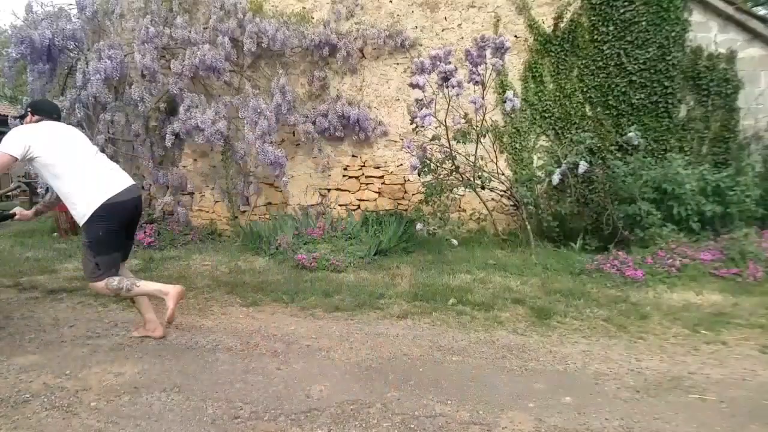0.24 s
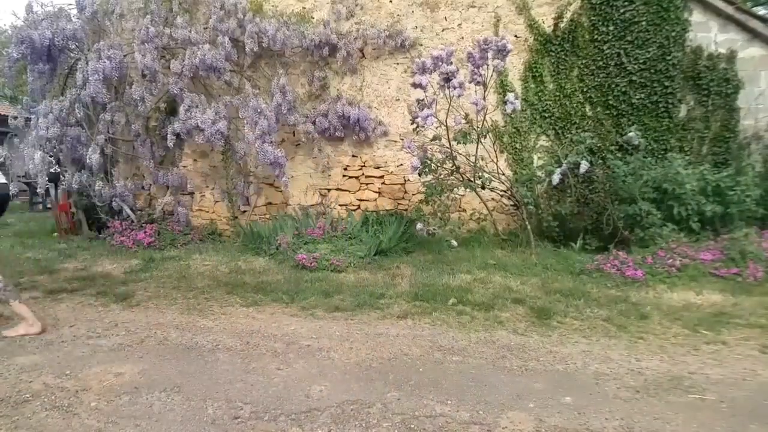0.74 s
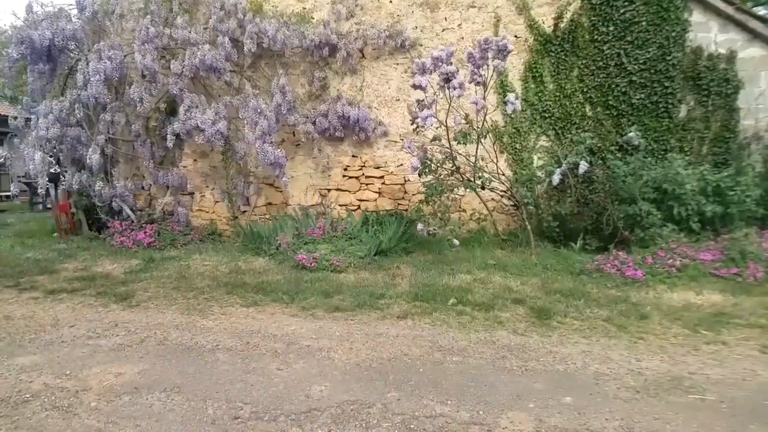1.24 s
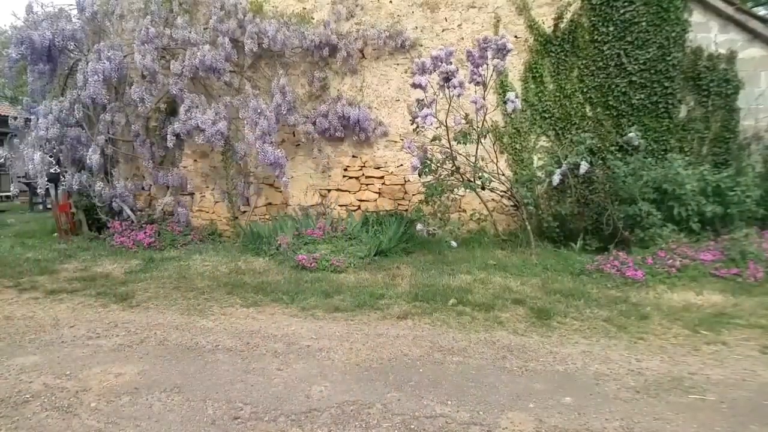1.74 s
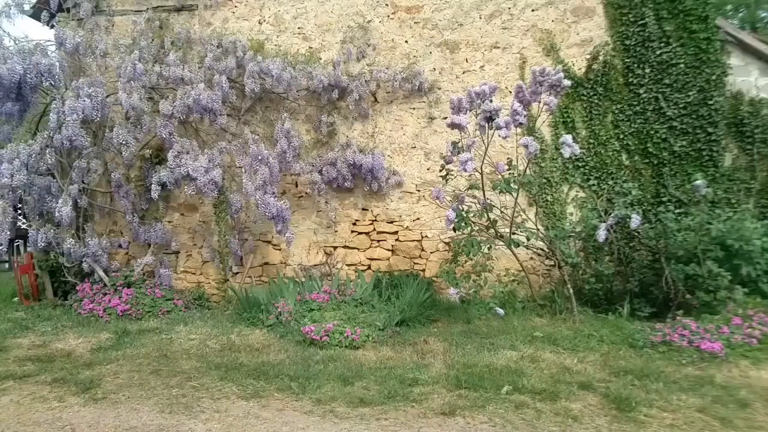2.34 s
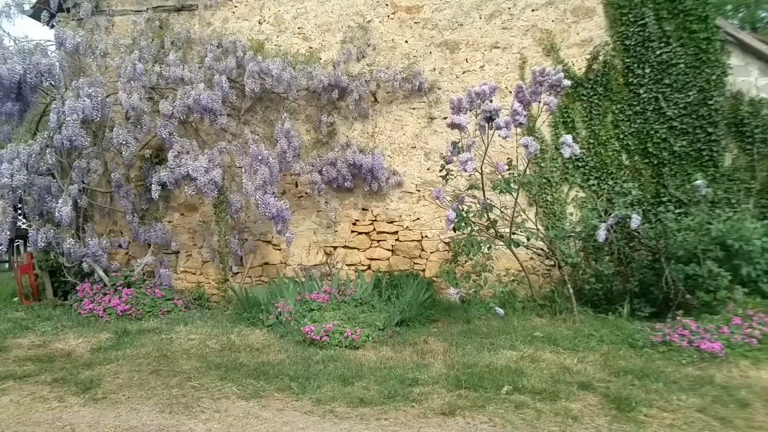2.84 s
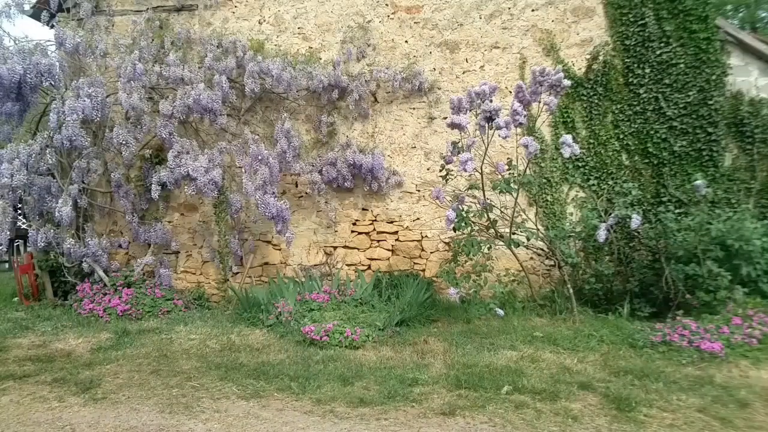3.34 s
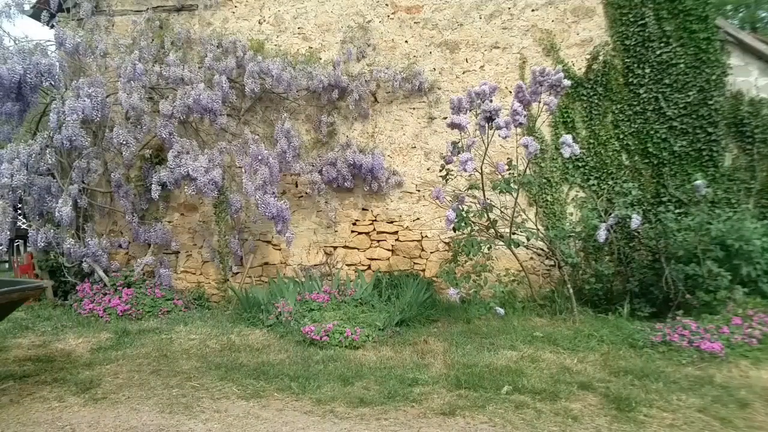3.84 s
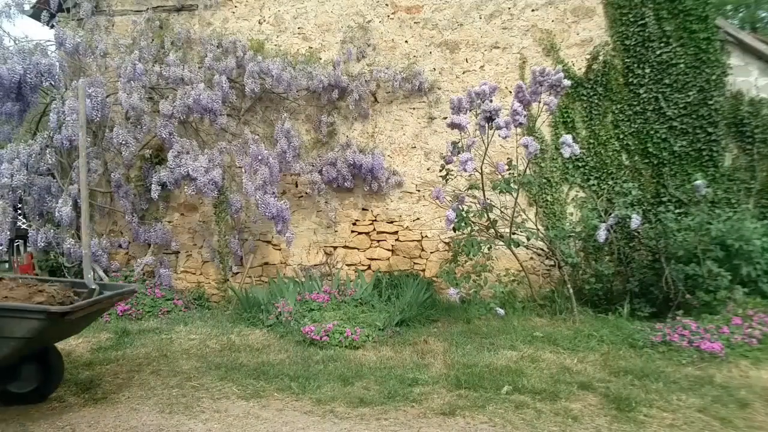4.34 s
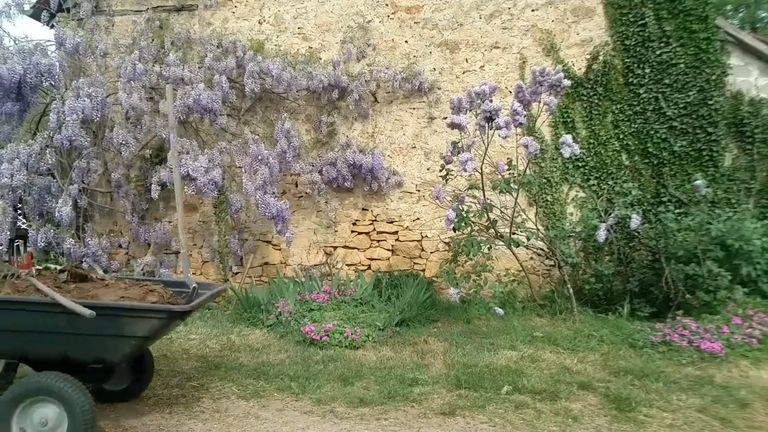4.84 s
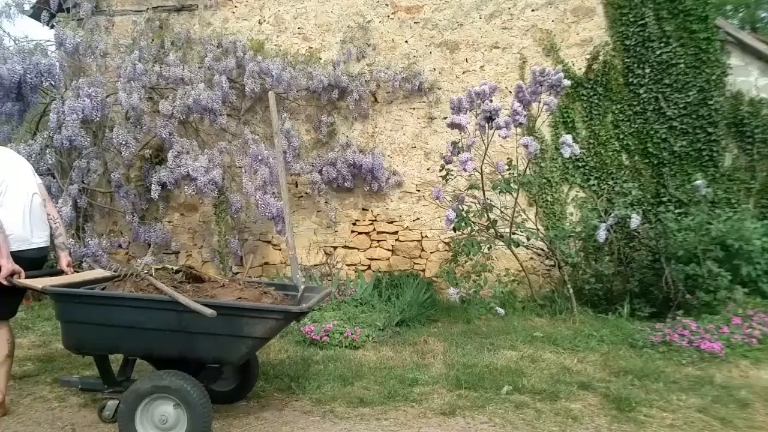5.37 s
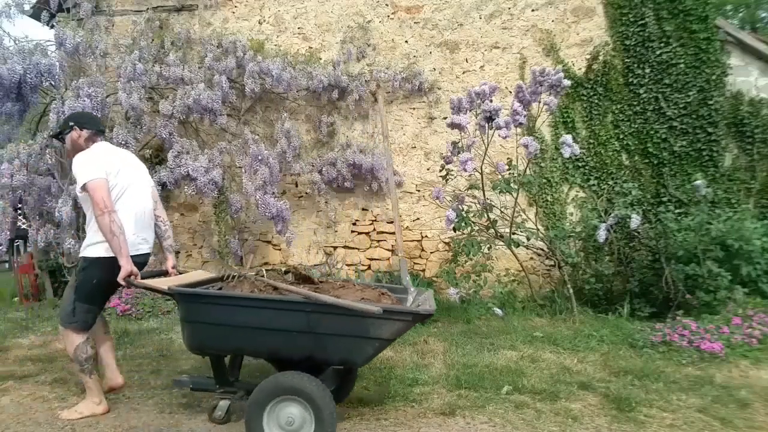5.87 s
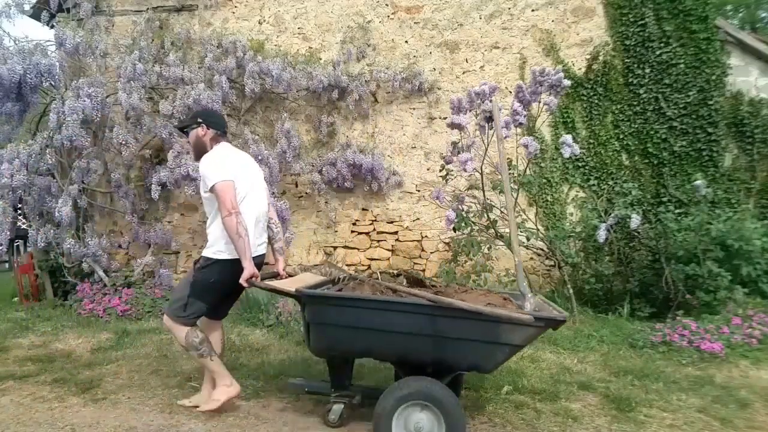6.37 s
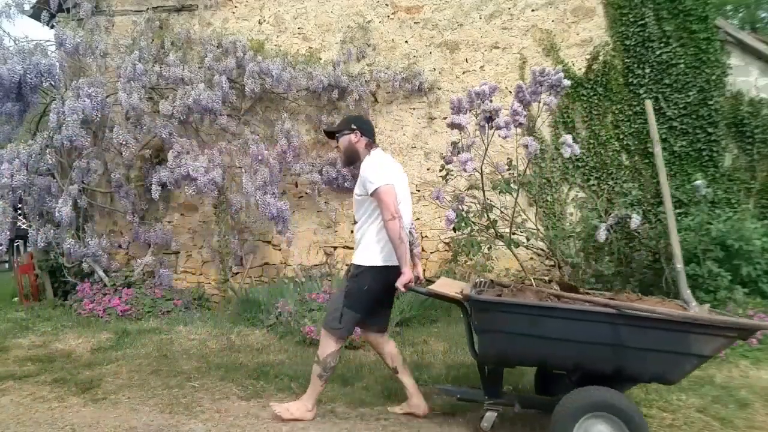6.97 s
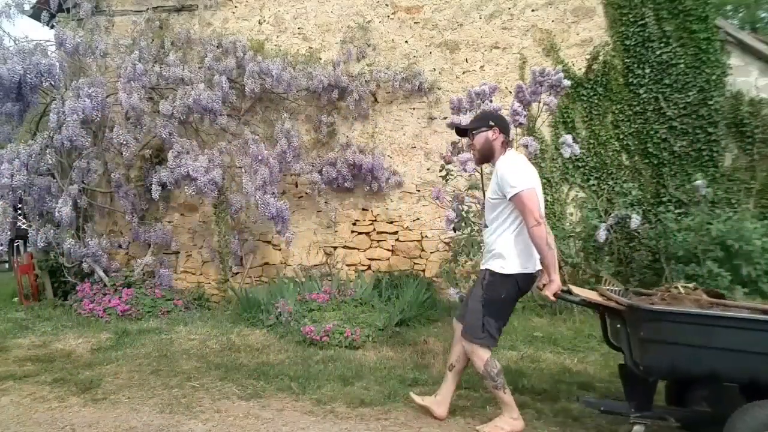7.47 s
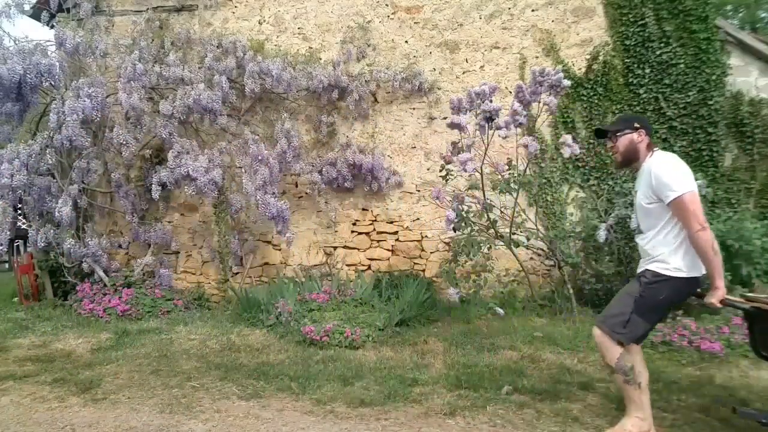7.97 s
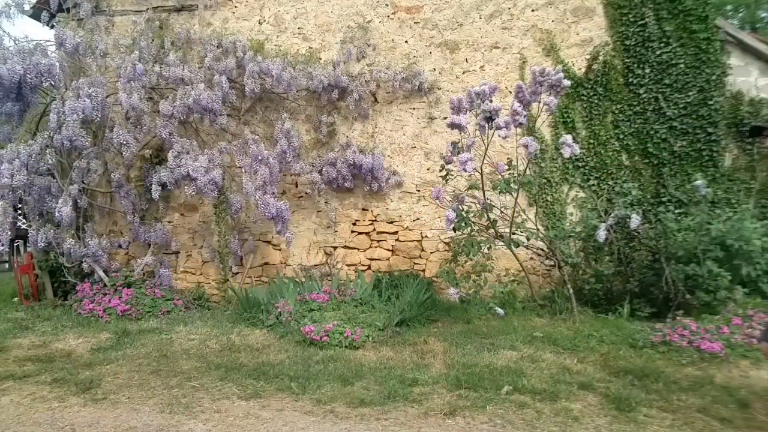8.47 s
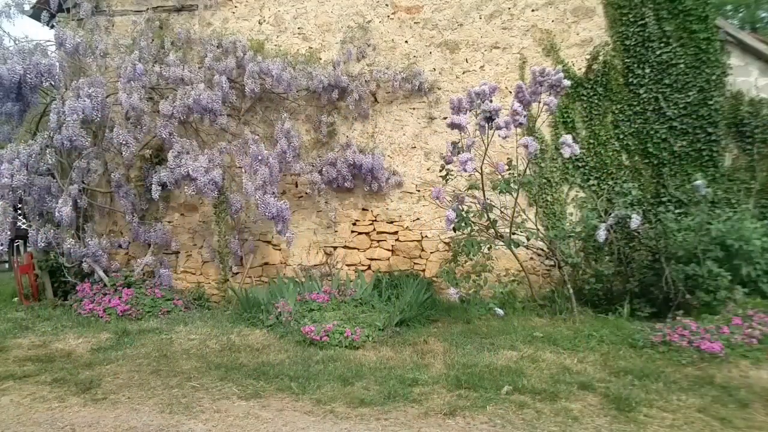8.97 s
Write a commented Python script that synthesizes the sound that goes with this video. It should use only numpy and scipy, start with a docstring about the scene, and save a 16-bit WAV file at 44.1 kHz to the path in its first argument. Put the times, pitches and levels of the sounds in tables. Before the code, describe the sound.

In a quiet garden, a loaded plastic barrow starts close on the left at 0 s, rolling away over gravel: low tyre drone, hollow tread popping that rises in pitch until about 1 s, crunching stones and flicking pebbles, with tub booms and metal rattle. From 1.5 to 3.5 s it is further off at far left, duller, low knocks and rattles with short dips near 2.1, 2.9 and 3.4 s. From about 3.8 s it returns over rough grass, with deep soft thumps, hollow tub knocks, shovel and frame clatter, and a loose steel fitting clinking around 4.4-6.1 s. A crunch swells near 5 s, then a brief lull. It passes centre around 7 s with hard clacks and slams at 7.2 and 7.5 s, then moves right, still bumping, clinking near 8.2 s and rattling to the end at 9.2 s. Faint wall echo, hushed air.

```python
"""In a garden, a loaded plastic barrow is hauled off over gravel, then drawn back over rough grass close by.
Every bump is a quick cluster of collisions that excites the resonances of all parts at once:
the tub booms, its walls clack and the frame and a shovel clatter, while a loose fitting skids and clinks.
Small chance collisions rattle on between the bumps; tyres drone and thump, treads pop and stones crunch.
A stone wall returns one faint dull echo, and filtered noise makes the still air."""
import sys
import numpy as np
from scipy import signal
from scipy.fft import rfft, irfft, next_fast_len
from scipy.io import wavfile

SR = 44100
rng = np.random.default_rng(int(sys.argv[2]) if len(sys.argv) > 2 else 0)


def dump(signal):
    """Clip the signal to [-1, 1] and save it as 16-bit WAV at the path in sys.argv[1]."""
    limited = np.clip(np.atleast_2d(signal).T, -1, 1)
    pcm = np.round(limited * 32767).astype(np.int16)
    wavfile.write(sys.argv[1], SR, pcm)


N = 406143
TIME = np.arange(N) / SR
FFT_SIZE = next_fast_len(N + SR // 2)
RING_SIZE = 16384  # samples
SPAN_S = .03  # an event's level is its energy spread over this time

# path of the barrow, as a lean that each part scales: (time [s], left minus right [dB])
PLACE = [(0, -16), (1.4, -27), (2.5, -32), (4.3, -23.5), (6.1, -5.5), (7.4, 0.5), (8.2, 8), (9.21, 15.5)]
# broad colour of the tub floor and walls from close by: (frequency [Hz], relative level [dB])
BOOM = [(25, -64), (42, -54), (70, -6.5), (100, -7), (135, 1), (200, 6.5), (290, -1), (380, 2.5),
        (600, -51.5)]
WALL = [(170, -35.5), (280, -7.5), (350, -3.5), (480, 4.5), (590, -1), (800, -4), (1030, 0), (1300, -6.5),
        (1600, -13), (2500, -37)]
# the same, end-on and further off: (frequency [Hz], relative level [dB])
BOOM_FAR = [(25, -54), (45, -38), (75, -40), (105, -6.5), (140, 7), (195, 3.5), (235, -3.5), (290, 3),
            (380, -4), (600, -46)]
WALL_FAR = [(170, -26), (280, -8), (350, -0.5), (450, 11), (560, 2.5), (720, 1.5), (920, 0), (1100, -3.5),
            (1350, -20), (1550, -4.5), (2300, -47.5)]
# resonances over the close colour: (frequency [Hz], width [Hz], height [dB])
BOOM_MODES = [(117.4, 17, 10.5), (193, 116, 2)]
WALL_MODES = [(412, 39, 8.5), (718.7, 38, 14), (879, 58, 6.5), (930, 55, 5.5), (970, 41, -11.5)]
KNOCK_DB = 0.5  # gain of the knocks beside the clacks


def tub(cluster):
    """Forced vibration of a shell: the loaded floor booms, the plastic walls clack, and knocks ring the hollow."""
    thuds = [bumps(cluster, order=1, db=-1.5, hardness_share=0.03, scatter_db=5.0),
             shaking(rattle(order=1), order=1, db=5.0, scatter_db=4.5, count=600)]
    boom = turning(thuds, colour(BOOM_FAR), colour(BOOM, BOOM_MODES),
                   t60=0.17, tail_db=-7.0, tail_t60=0.32, apart=0.33, count=5)
    clacks = [bumps(cluster, order=2, db=-1.5, hardness_share=-0.19, scatter_db=3.5),
              shaking(rattle(order=2), order=1, db=-0.5, scatter_db=5.5, count=650)]
    clack = turning(clacks, colour(WALL_FAR), colour(WALL, WALL_MODES),
                    t60=0.2, tail_db=-14.5, tail_t60=0.19, apart=0.078, count=9, patchy_db=2.5)
    side_db = curve(PLACE, TIME)
    floor = undb(1.54) * pan(boom, 0.68 * side_db - 1.0)
    walls = undb(-0.5) * pan(clack + undb(KNOCK_DB) * knocks(), 0.69 * side_db + 0.28)
    return floor + walls


# the load knocks low on the tub's floor or higher on its walls:
# (time [s], relative level [dB], pitch of the spot [Hz])
KNOCKS = [(.265, -31, 710), (.305, -31.5, 900), (.59, -27, 865), (.906, -19, 148), (1.125, -22, 150),
          (1.757, -26.5, 162), (1.959, -28, 150), (2.298, -21, 190), (2.487, -25, 188), (2.684, -19, 225),
          (3.006, -21, 170), (3.163, -21.5, 186), (3.778, -28.5, 710), (3.889, -27, 190), (3.92, -26, 444),
          (4.27, -22.5, 710), (4.295, -23.5, 432), (4.312, -24, 710), (4.355, -28.5, 716),
          (4.443, -22.5, 200), (4.644, -26.5, 432), (4.695, -38, 915), (4.765, -22, 294), (4.782, -41, 930),
          (5.261, -22, 450), (5.559, -24.5, 433), (5.668, -35, 900), (6.034, -22.5, 308),
          (6.135, -31.5, 930), (6.397, -31, 960), (6.546, -31, 435), (6.662, -25, 930), (6.775, -30, 740),
          (6.81, -30.5, 930), (6.952, -24.5, 432), (7.03, -31, 432), (7.03, -26.5, 1050), (7.175, -27, 900),
          (7.228, -29, 716), (7.473, -28, 930), (7.543, -22, 724), (7.9, -33.5, 716), (8.0, -28, 210),
          (8.139, -30, 244), (8.165, -25, 705), (8.285, -26.5, 710), (8.4, -29.5, 229), (8.589, -26.5, 710),
          (8.868, -35, 720)]
# resonances of the tub, before the load shifts them: (frequency [Hz], decay by 60 dB [s])
TUB_MODES = [(122, 0.07), (150, 0.16), (186, 0.18), (240, 0.064), (340, 0.053), (432, 0.15), (497, 0.023),
             (716, 0.14), (868, 0.041), (932, 0.08), (1040, 0.024)]
KNOCK_PUSH_S, KNOCK_BOUNCE_S = 0.0019, .006  # time constant of the onset; least delay of a repeat touch
KNOCK_DETUNE = 0.017  # standard deviation of each resonance's shift under the load, as a share
OFF_PITCH_DB_PER_OCTAVE = 33  # loss of a resonance away from the spot's pitch
LOW_CUT_HZ = 119  # low cut of the knocks


def knocks():
    """Modal excitation: quick touches on one spot favour the tub resonances nearest that spot's pitch."""
    t = np.arange(RING_SIZE // 2) / SR
    out = np.zeros(N + SR)
    chances = rng.standard_normal((len(KNOCKS), len(TUB_MODES) + 2))
    for (start, db, pitch), chance in zip(KNOCKS, chances):
        tone = 0
        for (hz, t60), shift in zip(TUB_MODES, chance):
            lead = undb(-OFF_PITCH_DB_PER_OCTAVE * abs(np.log2(hz / pitch)))
            wave = np.sin(2 * np.pi * hz * (1 + KNOCK_DETUNE * shift) * t)
            tone = tone + lead * wave * np.exp(-np.log(1000) * t / t60)
        # two weaker repeat touches
        bounces = sum(.5 * np.interp(t - KNOCK_BOUNCE_S * (1 + abs(c)), t, tone, left=0) for c in chance[-2:])
        tone = (tone + bounces) * (1 - np.exp(-t / KNOCK_PUSH_S))
        i = int(start * SR)
        out[i:i + len(t)] += tone * undb(db) * np.sqrt(SPAN_S * SR / np.sum(tone ** 2))
    low_cut = signal.butter(4, LOW_CUT_HZ, "high", fs=SR, output="sos")
    return signal.sosfilt(low_cut, out[:N])


# broad colour of the frame and shovel and of their hardest contacts: (frequency [Hz], relative level [dB])
METAL = [(900, -15), (1400, -6), (1650, -7), (2100, 1), (2900, 10.5), (3500, 8), (4000, 0.5), (4700, -36),
         (5600, -1.5), (8000, -65.5)]
EDGE = [(3300, -5.5), (4800, 5), (6000, -0.5), (7300, 4), (8600, -3), (11000, -11), (13000, -19),
        (14600, -40), (16000, -29)]
# the metal, end-on and further off: (frequency [Hz], relative level [dB])
METAL_FAR = [(900, -29), (1400, -21), (1700, 4.5), (1950, 6.5), (2500, 5.5), (3200, 7.5), (3800, -11),
             (4700, 5.5), (5600, -17), (8000, -78)]
# resonances over the close colour: (frequency [Hz], width [Hz], height [dB])
METAL_MODES = [(1610, 53, 16), (1980, 46, 4), (2153, 55, 6), (2316, 65, 4), (3650, 290, -8.5),
               (4100, 120, -8)]
EDGE_MODES = [(5100, 540, 9), (5190, 140, -8), (6000, 210, 3), (8800, 150, -19), (11220, 200, 2.5)]
METAL_LEAN, METAL_SIDE_DB = 0.55, -7.5  # share of the path's lean; added left minus right


def metalwork(cluster):
    """Contact hardness sets bandwidth: loose frame and shovel clatter; the hardest contacts add a sharp edge."""
    rattles = [bumps(cluster, order=3, db=-1.0, hardness_share=0.24, scatter_db=4.5),
               shaking(rattle(order=3), order=1, db=-8.5, scatter_db=3.0, count=700)]
    clatter = turning(rattles, colour(METAL_FAR), colour(METAL, METAL_MODES),
                      t60=0.14, tail_db=-8.5, tail_t60=0.16, apart=0.43, count=8)
    ticks = [bumps(cluster, order=3, db=-13.5, hardness_share=1.0, scatter_db=-0.5),
             shaking(rattle(order=3), order=1, db=-18.5, scatter_db=9.5, count=700)]
    edge = strike(ticks, colour(EDGE, EDGE_MODES), t60=0.11, tail_db=-23.5, tail_t60=0.63, apart=1.0, count=7)
    side_db = METAL_LEAN * curve(PLACE, TIME) + METAL_SIDE_DB
    return undb(-5.0) * pan(clatter, side_db) + undb(0.57) * pan(edge, 0.18 * side_db)


# the barrow drops back hard on its frame:
# (time [s], tub wall level [dB], frame level [dB], sharp edge level [dB])
SLAMS = [(.011, -30.5, -36, -36), (.555, -34, -27, -35), (1.083, -30, -30, -31), (1.149, -35, -38, -32),
         (3.158, -24.5, -37, -35), (3.481, -29, -42, -49), (3.992, -31, -30, -40), (4.422, -26.5, -40, -38),
         (5.286, -29, -32.5, -25), (5.72, -31.5, -39, -36.5), (6.295, -31, -36, -50),
         (6.399, -29.5, -41, -47), (6.959, -30, -26.5, -40), (7.177, -21, -27.5, -55),
         (7.232, -21.5, -24.5, -37), (7.475, -31, -37, -42), (8.168, -26.5, -25, -30.5),
         (8.346, -32, -27, -34), (8.591, -26.5, -30.5, -44), (8.858, -31, -32, -36),
         (9.009, -28, -29, -30.5)]


def slams():
    """Impulsive excitation: in one blow the tub wall cracks, the frame clangs and its edge snaps, all dying fast."""
    times, *levels_db = np.transpose(SLAMS)
    wall, frame, edge = ([(times, undb(db) * np.sqrt(SPAN_S * SR))] for db in levels_db)
    crack = strike(wall, colour(WALL, WALL_MODES),
                   t60=0.094, tail_db=-19, tail_t60=0.3, apart=.06, count=3, patchy_db=1.0)
    clang = strike(frame, colour(METAL, METAL_MODES), t60=.065, tail_db=-16, tail_t60=.2, apart=1, count=3)
    snap = strike(edge, colour(EDGE, EDGE_MODES), t60=0.061, tail_db=-26, tail_t60=0.28, apart=0.99, count=3)
    side_db = curve(PLACE, TIME)
    metal_side_db = METAL_LEAN * side_db + METAL_SIDE_DB
    return pan(crack, 0.8 * side_db) + pan(clang, metal_side_db) + pan(snap, .1 * side_db)


# a loose steel fitting jumps and clinks:
# (time [s], relative level [dB], pitch that the touched spot favours [Hz])
CLINKS = [(0.551, -16, 2630), (.762, -21, 2500), (1.971, -21, 2500), (2.009, -27.5, 3520),
          (4.421, -19, 2500), (4.531, -19, 2550), (4.688, -19, 2570), (4.743, -20.5, 2480),
          (5.064, -22, 2580), (5.421, -33.5, 3540), (5.546, -22, 2630), (5.661, -27, 2480),
          (5.79, -34, 2090), (6.028, -18, 2600), (6.049, -23, 2340), (6.095, -27, 2600), (7.016, -26, 2640),
          (8.169, -22, 2090), (8.233, -20, 2600), (8.346, -20, 2090), (8.463, -31, 2090)]
# ring of the fitting, before each touch bends it: (frequency [Hz], relative level [dB], decay by 60 dB [s])
FITTING = [(2090, -4, .07), (2340, -3, .07), (2480, -2, .06), (2640, 1, .045), (3520, -9, .04),
           (4350, -11, .04), (5230, -8, .05), (7090, -20, .05)]
SPOT_DB, SPOT_WIDTH_HZ = 15.5, 240  # lift of the modes near the favoured pitch, and its reach
SKID_GAP_S, SKID_FADE_DB = .003, -3  # median spacing of the touches; change of level from one to the next
SKID_DETUNE = .025  # standard deviation of each touch's bend of the ring, as a share
FITTING_LAG_S = 0.00026  # the clink reaches the left port this much later


def fitting(count=4):
    """Modal ringing under repeated contact: a clink is a skid of fading touches, each bending the ring a little."""
    t = np.arange(RING_SIZE // 2) / SR
    out = np.zeros(N + SR)
    for (start, db, pitch), (bends, gaps) in zip(CLINKS, rng.standard_normal((len(CLINKS), 2, count))):
        touch = 0
        for hz, mode_db, t60 in FITTING:
            lift_db = SPOT_DB * np.exp(-((hz - pitch) / SPOT_WIDTH_HZ) ** 2)
            decay = np.exp(-np.log(1000) * t / t60)
            touch = touch + undb(mode_db + lift_db) * np.sin(2 * np.pi * hz * t) * decay
        chime = 0
        for k in range(count):
            since = t - k * SKID_GAP_S * np.exp(.3 * gaps[k])
            bent = np.interp(since * (1 + SKID_DETUNE * bends[k]), t, touch, left=0)
            chime = chime + undb(SKID_FADE_DB * k) * bent
        i = int(start * SR)
        out[i:i + len(t)] += chime * undb(db) * np.sqrt(SPAN_S * SR / np.sum(chime ** 2))
    ports = np.array([np.interp(TIME - FITTING_LAG_S, TIME, out[:N]), out[:N]])
    return undb(-7.5) * pan(ports, 0.53 * curve(PLACE, TIME))


MAIN_HIT_DB = 2  # how far the main collision of a bump stands over the others, before scatter


def clusters(scatter_db, count=11):
    """Shared excitation: each bump's collisions crowd together, then thin out, about one stronger main hit."""
    rows = jolts()
    share = (np.arange(count) + rng.random((len(rows), count))) / count
    times = rows[:, :1] + rows[:, 1:2] * np.sqrt(-2 * np.log(1 - .98 * share))
    main_hit = np.arange(count) == count // 2
    db = scatter_db * rng.standard_normal((len(rows), count)) + MAIN_HIT_DB * main_hit
    return times, undb(db), rows[:, 2:3], rows[:, 3:4]


# the tyres hit a stone or a rut:
# (time [s], scale of the collisions' spread [s], relative strength [dB], hardness [dB])
BUMPS = [(.005, 0.0044, -24.5, 4.5), (0.139, 0.012, -32.5, 2), (.195, 0.011, -28.5, 3),
         (0.278, 0.0066, -29, -2), (0.3, 0.0062, -22.5, 2.5), (0.359, 0.009, -28.5, 2),
         (0.481, 0.005, -34, 6), (0.51, 0.0069, -27, 1), (.538, 0.0087, -26, 11.5), (.591, 0.014, -23, 5.5),
         (.661, 0.0069, -25.5, 4.5), (0.756, 0.0075, -32, 2), (.889, 0.012, -23.5, -1),
         (.956, 0.0049, -26.5, 6), (1.07, 0.016, -25, 4), (1.144, 0.0059, -23.5, 1.5),
         (1.396, 0.0038, -34, 10), (1.43, 0.013, -29.5, 6.5), (1.519, 0.0074, -34.5, -13),
         (1.658, 0.0038, -35, 0), (1.749, 0.011, -32.5, -6), (1.8, 0.003, -25, -1), (1.831, 0.0057, -35, 1),
         (1.868, 0.0041, -33, -3), (1.91, 0.015, -33, 1), (2.007, 0.0036, -30, 0.5),
         (2.157, .006, -29, -6.5), (2.22, 0.0043, -31.5, -20), (2.256, 0.023, -24, -0.5),
         (2.375, 0.02, -36, 0), (2.485, 0.002, -25.5, 0.5), (2.531, 0.0081, -28, 1), (2.594, 0.016, -21, 4),
         (2.663, 0.026, -22, 1), (2.903, 0.0023, -39, -2), (2.968, 0.0052, -33.5, -3),
         (3.002, 0.0051, -27.5, 1.5), (3.027, 0.016, -26.5, -9), (3.103, 0.014, -27.5, 0.5),
         (3.154, 0.0039, -24.5, 9), (3.179, 0.0048, -29, 4.5), (3.272, 0.0091, -31, -12),
         (3.454, 0.0082, -28, -5), (3.478, 0.0021, -24.5, 3.5), (3.52, 0.009, -25, 2),
         (3.62, 0.016, -29, 0), (3.715, 0.0042, -27, -2.5), (3.748, 0.0045, -29, 1),
         (3.779, 0.0048, -27, 3), (3.811, 0.0061, -27.5, -4), (3.854, 0.0037, -25.5, -3),
         (3.892, 0.0031, -33, 5), (3.926, 0.0047, -22.5, -2), (3.988, 0.003, -25.5, 1),
         (4.083, 0.0028, -35, -23), (4.125, 0.0027, -34, -8), (4.179, 0.0053, -30, -1),
         (4.213, 0.0036, -42.5, 16), (4.252, 0.0097, -24, 1.5), (4.29, 0.016, -26.5, -1),
         (4.338, 0.0089, -24.5, -2), (4.374, 0.0051, -26, 1), (4.422, 0.0027, -26.5, 2),
         (4.438, 0.016, -24.5, -2), (4.51, 0.0067, -32.5, 7), (4.59, 0.0083, -28, -1),
         (4.635, 0.0098, -33.5, -19), (4.681, .011, -22, 2), (4.739, 0.0065, -30.5, 5.5),
         (4.765, 0.015, -22.5, 0), (4.863, 0.0046, -41.5, 10.5), (4.912, 0.0028, -42.5, 2),
         (4.951, 0.0076, -30.5, 10.5), (5.013, 0.015, -20, 5.5), (5.059, 0.01, -25.5, 2),
         (5.231, 0.0028, -21.5, 2), (5.241, 0.0056, -31, 13), (5.255, 0.0043, -27, -10),
         (5.274, 0.008, -21.5, 6), (5.418, 0.012, -37, 4), (5.544, 0.017, -27, 4.5),
         (5.66, 0.0052, -42, -24), (5.718, 0.0044, -23, 7), (5.758, 0.0036, -32, -14),
         (5.79, 0.0041, -29.5, 1), (5.889, 0.0016, -36.5, 10.5), (5.92, 0.0032, -32.5, -17),
         (5.943, 0.0057, -29, 0), (5.979, 0.011, -22.5, 6), (6.02, 0.0089, -23.5, 9.5),
         (6.042, 0.0058, -22.5, 7.5), (6.1, 0.0037, -33, 5), (6.128, 0.01, -30, 7.5),
         (6.238, 0.011, -34, 1), (6.289, 0.0037, -29, 4), (6.362, 0.0059, -29.5, -2),
         (6.399, 0.0022, -36, -3), (6.444, 0.0034, -35.5, -3), (6.546, 0.0061, -31.5, -3),
         (6.603, 0.0084, -25.5, 5.5), (6.645, 0.014, -19, 8.5), (6.708, 0.0053, -29, -2),
         (6.754, 0.013, -27, 0), (6.807, 0.0028, -31.5, 6), (6.852, 0.0048, -31, -4),
         (6.907, 0.0059, -24.5, -1), (6.952, 0.0076, -18.5, 4.5), (6.979, 0.0056, -24.5, 7),
         (7.025, .012, -28, 1), (7.068, 0.009, -23.5, 0), (7.096, 0.0045, -22.5, 1),
         (7.134, 0.0074, -25, 2), (7.175, 0.0048, -22, 3.5), (7.227, 0.0061, -23.5, 2),
         (7.364, 0.0024, -26.5, 0), (7.424, 0.0035, -25.5, 2.5), (7.469, 0.0024, -32.5, 7),
         (7.536, 0.0079, -18, 4.5), (7.563, 0.0099, -16.5, -0.5), (7.6, 0.0048, -32, 8),
         (7.682, 0.0031, -30.5, -29), (7.774, 0.017, -24.5, -6), (7.829, 0.0059, -35.5, -3),
         (7.897, .004, -31, -7), (7.945, 0.0061, -33.5, -2), (7.999, 0.0038, -34, -37),
         (8.022, 0.014, -29.5, -7), (8.138, 0.0037, -32.5, -19), (8.167, 0.0045, -23.5, 0),
         (8.192, 0.0051, -28.5, 1), (8.235, 0.0063, -31, 1), (8.288, 0.0061, -27.5, -1),
         (8.337, 0.0093, -20.5, -2), (8.462, 0.0073, -33.5, -15), (8.573, 0.002, -35.5, -4),
         (8.591, 0.0027, -31, -2), (8.612, 0.0052, -31.5, -4), (8.676, 0.01, -42, 5),
         (8.752, 0.012, -23, 2), (8.858, 0.0026, -20.5, -3), (8.881, 0.004, -24, 0),
         (9.002, 0.0041, -23.5, 2), (9.026, 0.0064, -28.5, -5), (9.057, 0.0054, -24.5, -15),
         (9.08, .006, -24, -9), (9.105, 0.0039, -29.5, 4), (9.18, 0.003, -21.5, 0.5)]
# rattle from the roughness of the ground, with the pace: (time [s], relative level [dB])
GROUND = [(0, -33.5), (.5, -33), (1.05, -34), (1.3, -37.5), (1.5, -33.5), (1.62, -40.5), (1.85, -34),
          (2.1, -42.5), (2.45, -36.5), (2.87, -45.5), (3.1, -36.5), (3.42, -46.5), (3.75, -32.5),
          (4.1, -40), (4.3, -34.5), (4.95, -32.5), (5.15, -47), (5.45, -38.5), (6.5, -42), (7.05, -32),
          (7.32, -42.5), (7.75, -34), (8.1, -37.5), (8.3, -30), (8.53, -41.5), (8.75, -33), (8.96, -43.5),
          (9.2, -29.5)]
# lesser bumps: mean level over the ground's rattle, its greatest scatter either way, and hardness
JOLT_DB, JOLT_SCATTER_DB, JOLT_HARDNESS_DB = -3, 6, 1
JOLT_SPREAD_S = .003  # mean spread scale of a lesser bump


def jolts(count=36):
    """Random excitation by roughness: the big bumps, and chance lesser ones that are stronger on rough ground."""
    chance = rng.random((count, 3))
    times = (np.arange(count) + chance[:, 0]) * N / SR / count
    db = curve(GROUND, times) + JOLT_DB + JOLT_SCATTER_DB * (2 * chance[:, 1] - 1)
    spreads = JOLT_SPREAD_S * (.5 + chance[:, 2])
    lesser = np.column_stack([times, spreads, db, np.full(count, JOLT_HARDNESS_DB)])
    return np.vstack([BUMPS, lesser])


# relative level of each part as the barrow moves off and comes round:
# (time [s], boom [dB], wall clack [dB], metal clatter [dB])
PART_LEVELS = [(0, -4.5, -2, 1), (1.6, -3, -1, 5), (3, -6, 0.5, 2.5), (4.4, -6.5, 0, 2),
               (5.8, -8.5, 2.5, -3.5), (7.6, -13.5, 0.5, -3.5), (8.3, -9.5, -0.5, 2),
               (9.2, -11, -2.5, -2.5)]


def bumps(cluster, order, db, hardness_share, scatter_db):
    """Partition of impact energy: a part's share of hardness sets how much hard bumps favour it over soft ones."""
    times, sizes, strength_db, hardness_db = cluster
    sizes = sizes * undb(scatter_db * rng.standard_normal(sizes.shape))
    sizes *= np.sqrt(SPAN_S * SR / np.sum(sizes ** 2, axis=1, keepdims=True))
    part_db = curve(PART_LEVELS, times, order=order)
    sizes *= undb(db + strength_db + hardness_share * hardness_db + part_db)
    return times.ravel(), sizes.ravel()


AFTER_RATTLE_DB, SETTLE_S = -9, 0.012  # rattle after a bump, relative to it; time for that power to fall to 1/e


def rattle(order):
    """Energy balance: the ground sustains a part's rattle and bumps stir it up briefly; rows (time [s], level [dB])."""
    t = TIME[::100]
    power = undb(2 * curve(GROUND, t))
    for start, _, db, _ in BUMPS:
        settling = (t > start) * np.exp(-np.abs(t - start) / SETTLE_S)
        power = power + undb(2 * (db + AFTER_RATTLE_DB)) * settling
    return np.column_stack([t, 10 * np.log10(power) + curve(PART_LEVELS, t, order=order)])


def shaking(table, order, db, scatter_db, count):
    """Shot noise: small collisions at chance times, whose mean power follows a level curve."""
    chance = rng.random(count)
    times = (np.arange(count) + 2 * chance) * N / SR / count
    sizes = undb(scatter_db * np.clip(rng.standard_normal(count), -2, 2))
    return times, sizes * undb(db + curve(table, times, order=order)) * np.sqrt(N / np.sum(sizes ** 2))


# how far the tub has turned side-on and come close: (time [s], share [0-1])
SIDE_ON = [(0, 1), (1.2, 0.28), (3.2, 0), (4.3, 0.84), (6.5, 0.76), (9.2, 1)]


def turning(collisions, far, close, **ringing):
    """Directivity: power passes between a part's far and close colours as the barrow comes round."""
    times, sizes = np.hstack(collisions)
    share = np.clip(curve(SIDE_ON, times), 0, 1)
    views = [(1 - share, far), (share, close)]
    return sum(strike([(times, sizes * np.sqrt(part))], response, **ringing) for part, response in views)


DWELL_SIZE = 2400  # samples for which one contact point bears the load
PATCH_HZ = np.geomspace(600, 16000, 26)


def strike(collisions, response, t60, tail_db, tail_t60, apart, count=10, patchy_db=4):
    """Superposition of impulse responses: contact points have their own rings, and one bears most of the load."""
    times, sizes = np.hstack(collisions)
    at = np.clip(times * SR, 0, N + SR - 1).astype(int)
    loaded = rng.integers(0, count, (N + SR) // DWELL_SIZE + 1)[at // DWELL_SIZE]
    point = np.where(rng.random(len(at)) < .7, loaded, rng.integers(0, count, len(at)))
    pushes = np.zeros((count, N + SR))
    np.add.at(pushes, (point, at), rng.choice([-1, 1], len(at)) * sizes)
    f = np.fft.rfftfreq(RING_SIZE, 1 / SR)
    out = 0
    for push in pushes:
        # every point favours other patches of the spectrum
        patches_db = np.interp(f, PATCH_HZ, patchy_db * rng.standard_normal(len(PATCH_HZ)))
        answer = ring(response * undb(patches_db), t60, tail_db, tail_t60, apart)
        out = out + signal.oaconvolve(push[None, :N], answer[:, :-RING_SIZE // 16], axes=1)[:, :N]
    return out


APART_HZ = 1480  # scale above which the two ports hear mostly unrelated sound


def ring(response, t60, tail_db, tail_t60, apart):
    """Modal density and coherence: dense, fast-dying modes over a weak tail, less alike at the ports as pitch rises."""
    t = np.arange(RING_SIZE) / SR
    # rows of each: shared by both ports, left alone, right alone
    early, late = rng.standard_normal((2, 3, RING_SIZE))
    body = early * np.exp(-np.log(1000) * t / t60)
    tail = undb(tail_db) * (early + late) * np.exp(-np.log(1000) * t / tail_t60)
    crack = undb(3.5) * early * np.exp(-t / .0012)  # the first instant of contact stands out
    parts = rfft(crack + body + tail)
    own = apart + (np.fft.rfftfreq(RING_SIZE, 1 / SR) / APART_HZ) ** 2
    answer = irfft(response * (parts[0] + own * parts[1:]) / np.hypot(1, own))
    return answer / np.sqrt(np.sum(answer ** 2) / 2)  # mean energy 1 per port


def colour(points, modes=()):
    """Minimum phase: the causal frequency response of a broad spectrum with resonant peaks on it."""
    f = np.maximum(np.fft.rfftfreq(RING_SIZE, 1 / SR), 1)
    hz, db = np.transpose(points)
    broad = undb(np.interp(np.log(f), np.log(hz), db))
    peaks = sum(undb(2 * d) / (1 + (2 * (f - centre) / width) ** 2) for centre, width, d in modes)
    cepstrum = irfft(np.log(broad * np.sqrt(1 + peaks)))
    # fold the cepstrum onto positive time
    cepstrum[1:RING_SIZE // 2] *= 2
    cepstrum[RING_SIZE // 2 + 1:] = 0
    return np.exp(rfft(cepstrum))


def pan(x, balance_db):
    """Level difference between ports: lean a sound to one side at constant power."""
    gains = undb(np.array([balance_db, -balance_db]) / 2)
    return x * gains / np.sqrt(np.mean(gains ** 2, axis=0))


def curve(table, t, order=1):
    """Linear interpolation: one column of a table against its first column."""
    rows = np.array(table, float)
    return np.interp(t, rows[:, 0], rows[:, order])


def undb(db):
    """Logarithmic level: decibels to amplitude gain."""
    return 10 ** (np.asarray(db) / 20)


# stones crunching under the tyres: (time [s], relative level [dB])
GRIT = [(0, -55), (.2, -37), (.65, -33), (.85, -35.5), (1.28, -50), (1.5, -34.5), (1.65, -75), (3.45, -50),
        (3.8, -44), (4.3, -43.5), (4.75, -42.5), (5.03, -32.5), (5.17, -51), (5.45, -44.5), (6.5, -50.5),
        (6.75, -39.5), (7.15, -33.5), (7.3, -56), (7.8, -55), (8.55, -47), (9.2, -46)]
CRUNCH_GAP_S, CRUNCH_FADE_DB = 0.0021, -9.5  # mean time and change of level from one click to the next


def gravel(count=3):
    """Granular friction: stones give way in dense crunches, each a snap and a few weaker dry clicks."""
    stone = colour([(500, -37), (1200, -19), (2000, 2.5), (2800, 19),
                    (3700, 7), (4700, -15), (8000, -7.5), (15000, -40)])
    times, sizes = shaking(GRIT, order=1, db=-9, scatter_db=5, count=800)
    delays = CRUNCH_GAP_S * np.cumsum(rng.exponential(size=(len(times), count)), axis=1)
    click_times = (times[:, None] + delays).ravel()
    click_sizes = np.outer(sizes, undb(CRUNCH_FADE_DB * np.arange(count))).ravel()
    clicks = strike([(click_times, click_sizes)], stone,
                    t60=0.03, tail_db=-13, tail_t60=.1, apart=1, count=5, patchy_db=4)
    return pan(clicks, 0.08 * curve(PLACE, TIME))


PEBBLE_HZ, PEBBLE_SPREAD_OCTAVES = 3400, .26  # middle pitch of the stones and its scatter
PEBBLE_CYCLES = 24  # cycles in which a click falls by 60 dB


def pebbles():
    """Impact of small solids: stones flick out and knock in pairs, at two pitches and from a side of their own."""
    times, sizes = shaking(GRIT, order=1, db=-6.5, scatter_db=4.5, count=1700)
    chance = rng.standard_normal((len(times), 3))
    pitches = (PEBBLE_HZ * 2 ** (PEBBLE_SPREAD_OCTAVES * np.clip(chance[:, :2], -2, 2))).T
    sides = pan(sizes, 0.33 * curve(PLACE, times) + 5 * chance[:, 2]) / np.sqrt(2)
    return np.array([sum(grains(times, side, hz, PEBBLE_CYCLES, size=400) for hz in pitches) for side in sides])


# hollow rumble of the treads as the barrow gathers speed:
# (time [s], relative level [dB], middle pitch [Hz])
TREAD = [(0, -28.5, 620), (.2, -33, 696), (.55, -30, 850), (.8, -35, 880), (1.1, -57, 945)]
TREAD_CYCLES = 30  # cycles in which a pop falls by 60 dB


def treads():
    """Resonance of tread hollows: they pop over the stones, higher as the wheels speed up."""
    times, sizes = shaking(TREAD, order=1, db=-2, scatter_db=2.5, count=1400)
    hz = curve(TREAD, times, order=2) * (1 + 0.068 * rng.standard_normal(len(times)))
    return pan(grains(times, sizes, hz, TREAD_CYCLES), 0.65 * curve(PLACE, TIME))


def grains(times, sizes, hz, cycles, size=2048):
    """Damped oscillation: short rings, each at its own pitch, with energy set by size alone."""
    turns = hz[:, None] * np.arange(size) / SR
    rings = np.sin(2 * np.pi * turns) * np.exp(-np.log(1000) * turns / cycles)
    rings *= (sizes / np.linalg.norm(rings, axis=1))[:, None]
    at = (times[:, None] * SR).astype(int) + np.arange(size)
    return np.bincount(at.ravel(), rings.ravel(), minlength=N)[:N]


# drone of the tyres on the ground: (time [s], relative level [dB])
TYRES = [(0, -27.5), (.6, -30), (1.25, -26), (1.55, -43), (1.95, -35), (2.1, -55), (2.65, -38), (2.85, -50),
         (3.5, -46), (9.2, -53)]


def tyres():
    """Resonance under random forcing: countless stones press into the soft tyres, which drone low."""
    casing = colour([(50, -57), (100, 1.0), (130, 19.5), (160, 6.0), (220, 6), (500, -71)], [(140, 86, 13.5)])
    presses = shaking(TYRES, order=1, db=-4.5, scatter_db=2.5, count=1500)
    drone = strike([presses], casing, t60=0.025, tail_db=-4, tail_t60=0.058, apart=0.29, count=5)
    return pan(drone, 1.2 * curve(PLACE, TIME))


# thump of the soft tyres on the ground: (time [s], level relative to each bump [dB])
TURF = [(0, -21), (2, -32), (3.6, -25), (4.4, -18), (5.6, -20.5), (6.8, -20), (8, -20.5), (9.2, -23.5)]


def thumps():
    """Compliant contact: each bump presses into the soft tyres, which answer with a deep, short thump."""
    times, _, strength_db, _ = np.transpose(BUMPS)
    sizes = undb(strength_db + curve(TURF, times)) * np.sqrt(SPAN_S * SR)
    rubber = colour([(30, -18), (48, -25), (72, 3), (100, 4), (130, -8.5), (250, -34)])
    thud = strike([(times, sizes)], rubber, t60=0.15, tail_db=-16, tail_t60=0.41, apart=0.45, count=2)
    return pan(thud, 0.4 * curve(PLACE, TIME) - 3)


# still garden air: (frequency [Hz], relative level [dB])
AIR = [(25, -29), (90, -12), (300, -15.5), (1000, -21.5), (4000, -29), (9000, -45), (15000, -60)]


def air():
    """Stationary filtered noise: a faint even outdoor hush."""
    noise = rng.standard_normal((2, N))
    hush = signal.oaconvolve(noise, irfft(colour(AIR))[None], axes=1)[:, :N]
    return undb(-48.5) * hush / np.std(hush)


def scene():
    """Superposition and reflection: the barrow, its dull echo from the garden wall, and the air."""
    cluster = clusters(scatter_db=0.5)
    barrow = tub(cluster) + metalwork(cluster) + slams() + fitting()
    barrow = barrow + gravel() + pebbles() + treads() + tyres() + thumps()
    # the echo comes with its sides swapped
    dull = signal.sosfilt(signal.butter(1, 3000, fs=SR, output="sos"), barrow[::-1])
    echo = np.array([np.interp(TIME - .031, TIME, side, left=0) for side in dull])
    return barrow + undb(-26.5) * echo + air()


# lift of left minus right: (frequency [Hz], gain [dB])
SIDE_LIFT = [(800, 0), (1100, -1.5), (1450, 6.5), (1900, 8), (2500, -2.5), (4000, -0.5), (8000, -0.5)]
# phase lead of the left port, greatest in the bass: (frequency [Hz], lead [rad])
LEFT_LEADS = [(90, 0.98), (250, 0.62), (700, 0), (1000, 0.31)]
PORT_LAG_S = .000389  # travel time from one microphone port to the other
WIDEN_SHARE, WIDEN_FROM_HZ, WIDEN_FULL_HZ = 0.61, 740, 1290
TOP_HZ = 14900


def record(dry):
    """Delay-and-subtract directivity: each port loses a late copy of the other; side is reshaped, the top cut."""
    f = np.fft.rfftfreq(FFT_SIZE, 1 / SR)
    share = WIDEN_SHARE * np.interp(f, [WIDEN_FROM_HZ, WIDEN_FULL_HZ], [0, 1])
    # half of the phase lead goes to each port
    ports = rfft(dry, FFT_SIZE) * np.exp(.5j * np.array([[1], [-1]]) * curve(LEFT_LEADS, f))
    late = np.exp(-2j * np.pi * f * PORT_LAG_S) * ports[::-1]
    wide = (ports - share * late) / np.hypot(1, share)
    mid = wide.mean(axis=0)
    wide = mid + (wide - mid) * undb(curve(SIDE_LIFT, f))
    top_cut = signal.ellip(8, .2, 70, TOP_HZ, fs=SR, output="sos")
    return signal.sosfilt(top_cut, irfft(wide, FFT_SIZE)[:, :N])


dry = scene()
out = record(dry)
dump(out)
```